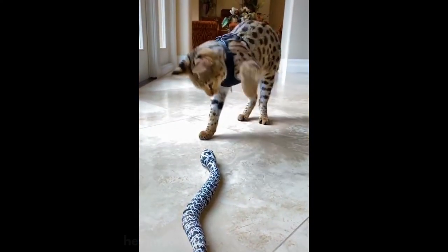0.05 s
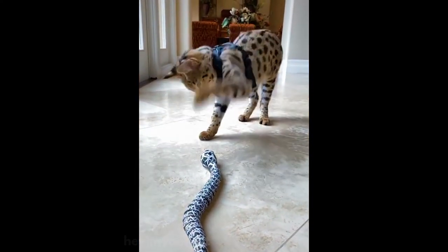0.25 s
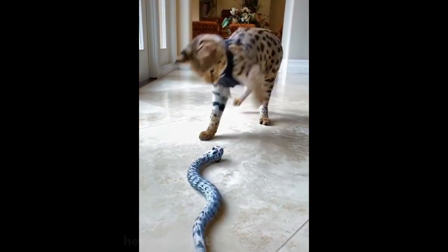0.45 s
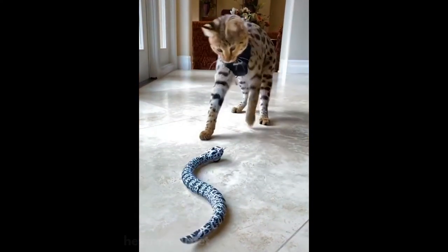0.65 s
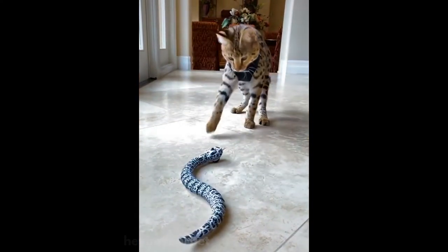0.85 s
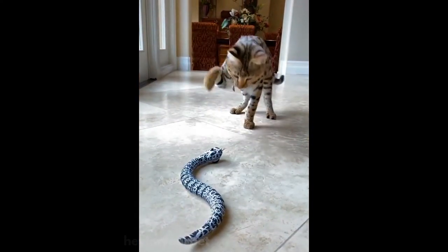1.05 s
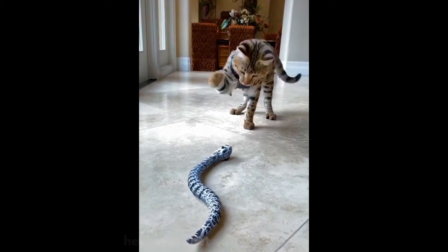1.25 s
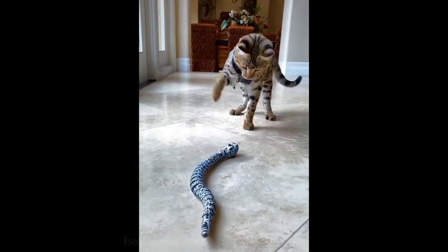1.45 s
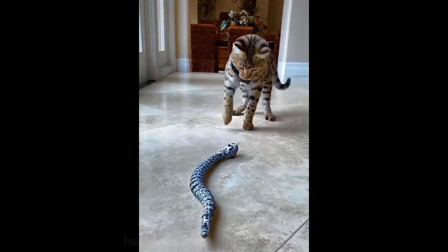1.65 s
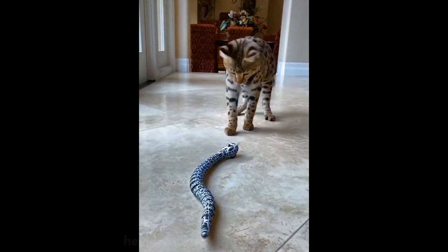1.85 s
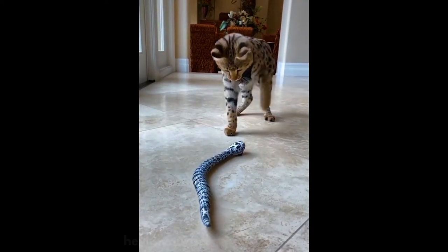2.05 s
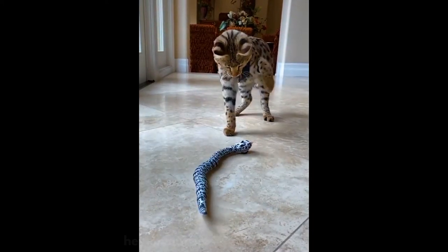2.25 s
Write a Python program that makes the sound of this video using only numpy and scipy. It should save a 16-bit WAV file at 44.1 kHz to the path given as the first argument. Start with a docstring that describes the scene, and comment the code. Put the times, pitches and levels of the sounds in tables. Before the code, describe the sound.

Toy snake of hard plastic segments: faint click, hollow paw knock, clattering skid and sharp slap, a pause, then a loud close click and clacking wriggle, repeated once more, with bright room echo over low rumble.

```python
"""A plastic toy snake skids, slaps and clacks on a stone floor after a cat swats it, then wriggles twice.
Its body is noise cut into dense ticks and single cracks, filtered to sound like plastic; its gears sizzle.
A button close to the microphone, first faint and then twice loud, is a set of dying tones with a scratchy edge.
The paw is a sinking thud and a hollow knock. A hard room rings after snake and button, over rumble and hum."""
import sys
import numpy as np
from scipy import signal
from scipy.fft import rfft, irfft
from scipy.io import wavfile

SR = 44100
rng = np.random.default_rng(int(sys.argv[2]) if len(sys.argv) > 2 else 0)


def put_to_file(sound):
    """Save the sound as 16-bit audio at rate SR, in the file named by the first command-line argument."""
    columns = np.atleast_2d(sound).T  # one column per channel
    safe = np.clip(columns, -1, 1)
    whole_steps = np.round(safe * 32767)
    wavfile.write(sys.argv[1], SR, whole_steps.astype(np.int16))


N = 99225  # length of the scene in samples
SHORT = np.arange(SR // 8) / SR  # time axis of one contact (s)


def amp(db):
    """Turn decibels into a gain."""
    return 10 ** (np.asarray(db) / 20)


def unit(x):
    """Scale to an rms (average strength) of 1."""
    return x / np.sqrt(np.mean(x ** 2) + 1e-20)


def along(points, hz):
    """Read a curve of (Hz, value) points at any frequency, on a log axis."""
    point_hz, values = np.transpose(points)
    return np.interp(np.log(hz + 1), np.log(point_hz + 1), values)


def fade(t, t60):
    """Silence before t = 0, then a steady dying away by 60 dB in t60 seconds."""
    return (t >= 0) * np.exp(-np.log(1000) * np.abs(t) / t60)


def coloured(x, points):
    """Filter to a (Hz, dB) curve, using only past sound and keeping the power of white noise."""
    size = 4096
    gain = unit(amp(along(points, np.fft.rfftfreq(size, 1 / SR))))
    # folding the cepstrum (spectrum of the log gain) makes the filter respond as early as it can
    cepstrum = irfft(np.log(gain), size)
    cepstrum[1:size // 2] *= 2
    cepstrum[size // 2 + 1:] = 0
    response = irfft(np.exp(rfft(cepstrum)), size)
    return signal.oaconvolve(x, response)[:N]


def placed(sounds):
    """Add up (start in seconds, short sound) pairs on the time line."""
    out = np.zeros(N + SR)
    for s, sound in sounds:
        out[round(s * SR):][:len(sound)] += sound
    return out[:N]


def ring(modes, rise):
    """After one blow a body sounds several dying tones, each level varied a little at random."""
    tones = 0
    for hz, db, t60 in modes:
        level = amp(db + rng.normal())
        tones = tones + level * np.sin(2 * np.pi * hz * SHORT) * fade(SHORT, t60)
    return (1 - np.exp(-SHORT / rise)) * tones


def cracks(rows, t60):
    """Each (start, dB) hit is a burst of random plus and minus signs under a smooth decay."""
    decay = fade(SHORT, t60) * (1 - np.exp(-SHORT / 0.00014))  # attack in s
    power = placed((s, (amp(db) * decay) ** 2) for s, db in rows)
    return np.sign(rng.standard_normal(N)) * np.sqrt(power)


def ticks(rate, spread_db, t60):
    """Many tiny hits at random moments, rate per second, shape noise into a stream of rms 1."""
    strength = amp(spread_db * np.clip(rng.standard_normal(N), -2, 2))
    hits = (rng.random(N) < rate / SR) * strength
    power = signal.oaconvolve(hits ** 2, fade(SHORT, t60) ** 2)[:N]
    return unit(np.sqrt(np.abs(power)) * rng.standard_normal(N))


def movement(rows, rise, fall_db_per_s):
    """Loudness of movements that swell for up to rise seconds and run out after their length."""
    t = np.arange(SR * 3 // 4) / SR
    start_db = 20.5 * np.clip(1 - t / rise, 0, 1) ** 2  # starts 20.5 dB down
    powers = []
    for s, length, db in rows:
        fall_db = fall_db_per_s * np.maximum(t - length, 0)
        powers.append((s, amp(db - start_db - fall_db) ** 2))
    return np.sqrt(placed(powers))


def room_tone():
    """Filtered noise makes a low rumble with faint hiss; a steady sine makes a faint hum."""
    # Colour of the background noise. Each row: frequency in Hz, relative level in dB per Hz.
    floor_colour = [(15, -43), (25, -6.5), (77, -2), (123, -8.5), (257, -15.5), (300, -14), (770, -24),
                    (833, -23), (1030, -22), (1330, -26.5), (1780, -25), (2030, -27), (2190, -26),
                    (7910, -37.5), (13000, -42)]
    floor_db, hum_hz, hum_db = -58, 248.7, -67.5
    highpass = signal.butter(4, 36, "high", fs=SR, output="sos")  # cutoff in Hz
    noise = signal.sosfilt(highpass, coloured(rng.standard_normal(N), floor_colour))
    hum = np.sin(2 * np.pi * hum_hz * np.arange(N) / SR)
    return amp(floor_db) * unit(noise) + amp(hum_db) * hum


def button():
    """Each press snaps and rings one note with a scratchy edge; low knocks dull the first and mark returns."""
    # Button going down. Each row: start in seconds, snap level in dB, ringing note level in dB.
    presses = [(0.1055, -27, -46), (0.9155, -4.5, -15), (1.6267, -6.5, -14.5)]
    # Tones of the snap. Each row: frequency in Hz, relative level in dB, time to fall 60 dB in seconds.
    snap = [(760, -23, 0.024), (890, -17, .012), (1620, -11.5, 0.0054), (1895, -13, 0.01),
            (3400, -20, .008), (5830, -13.5, 0.017), (6320, 5.5, 0.0033), (6870, -11, 0.009),
            (8660, -11.5, .007), (9170, -13, .007), (12300, -14.5, 0.004)]
    # Low knock of the button: under the faint first press, then at each return.
    # Each row: start in seconds, level in dB.
    knocks = [(0.1064, -41), (1.0826, -26.5), (1.9664, -25)]
    # Tones of the low knock. Each row: frequency in Hz, relative level in dB, 60 dB fall in seconds.
    knock_tones = [(480, -26.5, .018), (709, 4.5, 0.023), (964, -4, 0.024), (1410, -8.5, 0.036),
                   (1840, 7.5, .016), (1990, 3, 0.029)]
    # Scratchy edge of each press. Each row: start in seconds, level in dB.
    grit = [(0.1057, -36), (0.9152, -29.5), (1.6263, -31.5)]
    # Colour of that edge. Each row: frequency in Hz, relative level in dB per Hz.
    grit_colour = [(200, -23), (900, 4.5), (1300, -3.5), (2200, 2), (3000, 4.5), (4500, 2), (7000, 0),
                   (10000, -10.5), (13000, -22.5)]
    note_hz, note_t60_s, note_rise_s = 4434, 0.018, 0.00023

    snaps = []
    for s, db, note_db in presses:
        snap_sound = amp(db) * ring(snap, rise=0.00043)
        note = amp(note_db) * ring([(note_hz, 0, note_t60_s)], note_rise_s)
        snaps.append((s, snap_sound + note))
    low_knocks = [(s, amp(db) * ring(knock_tones, rise=0.0007)) for s, db in knocks]
    scratch = coloured(cracks(grit, t60=0.027), grit_colour)
    clicks = placed(snaps) + placed(low_knocks) + scratch
    # the small housing gives little below 362 Hz
    highpass = signal.butter(2, 362, "high", fs=SR, output="sos")
    return signal.sosfilt(highpass, clicks)


def room(x):
    """A hard room's tail: noise that dies away after a short delay, the treble first."""
    # How long the room rings. Each row: frequency in Hz, time to fall 60 dB in seconds.
    room_t60 = [(300, 0.69), (2500, 0.63), (5500, 0.61), (9000, 0.38), (13000, 0.23)]
    delay_s = 0.012
    hz, t, bands = signal.stft(rng.standard_normal(SR), SR, nperseg=256)
    dying_bands = bands * fade(t, along(room_t60, hz)[:, None])
    tail = signal.istft(dying_bands, SR, nperseg=256)[1]
    tail = np.pad(tail / np.linalg.norm(tail), (int(delay_s * SR), 0))
    return signal.fftconvolve(x, tail)[:N]


def room_echo(driven, struck, clicks):
    """Echo of the snake and, more weakly, of the button, with the room's own colour."""
    # Colour of the button's echo. Each row: frequency in Hz, relative level in dB.
    button_echo = [(300, -5), (800, -3), (2000, -2.5), (3500, 1.5), (4300, -3), (4700, 0.5), (5500, -12),
                   (7000, -8.5), (9000, -4), (13000, -4)]
    # Colour of the whole echo. Each row: frequency in Hz, relative level in dB.
    room_colour = [(300, 1.5), (1200, 3), (2500, -1.5), (3300, 2), (3900, -6.5), (5200, 2.5), (6600, 2),
                   (9000, 0), (12500, 2)]
    driven_db, struck_db, button_db = -8.5, -8, -23.5
    into_room = amp(driven_db) * driven + amp(button_db) * coloured(clicks, button_echo)
    echo = room(into_room) + room(amp(struck_db) * struck)
    return coloured(echo, room_colour)


def paw():
    """The paw knocks on the hollow head, which rings, and adds a soft thud whose pitch sinks."""
    # Tones of the hollow head. Each row: frequency in Hz, relative level in dB, 60 dB fall in seconds.
    head = [(620, -19.5, 0.027), (1030, -18, 0.051), (1590, -4, 0.029), (1930, -0.5, 0.023),
            (2350, -2, 0.042)]
    head_s, head_db = 0.2098, -18.5
    thud_s, thud_db, thud_t60_s = 0.214, -36.5, 0.14
    start_hz, end_hz, sag_s = 230, 75, 0.0086  # sag_s: how quickly the pitch sinks

    hz = end_hz + (start_hz - end_hz) * np.exp(-SHORT / sag_s)
    tone = np.sin(2 * np.pi * np.cumsum(hz) / SR)
    thud = amp(thud_db) * tone * fade(SHORT, thud_t60_s) * (1 - np.exp(-SHORT / 0.0024))
    knock = amp(head_db) * ring(head, rise=0.0014)
    return placed([(thud_s, thud), (head_s, knock)])


def swat():
    """The snake skids, shoved or coasting, in a dense clatter of ticks and slaps the floor in cracks."""
    # Sliding along the floor. Each row: start in seconds, length in seconds, level in dB.
    skids = [(0.2105, 0.012, -27), (0.2155, 0.0054, -20), (0.258, 0.045, -24.5), (0.31, 0.061, -28.5),
             (1.985, 0.048, -40), (2.07, 0.017, -42.5)]
    # Colour of the sliding. Each row: frequency in Hz, relative level in dB per Hz.
    sliding = [(200, -25), (700, -24), (1300, -21), (1700, -13), (2100, -5.5), (2600, 3.5), (3300, -4.5),
               (4300, 1), (5300, -8), (7000, -8.5), (9300, -9.5), (10500, -20), (13000, -22.5)]
    # The body slapping the floor. Each row: start in seconds, level in dB.
    slaps = [(0.3368, -10), (0.3395, -17.5), (0.3430, -20), (0.4448, -30)]
    # Colour of the slaps. Each row: frequency in Hz, relative level in dB per Hz.
    slapping = [(300, -33), (1100, -14.5), (1900, -12), (2550, 0), (3100, -6.5), (3700, 1), (4500, -2),
                (5700, 0), (7000, -4), (9800, -3), (10800, -15.5), (13000, -13)]
    loudness = movement(skids, rise=0.0013, fall_db_per_s=613)
    skid = loudness * ticks(rate=2000, spread_db=2, t60=0.027)
    return coloured(skid, sliding) + coloured(cracks(slaps, t60=0.038), slapping)


def wriggle():
    """Gears sizzle and segments tick against each other, with clacks as joints hit their stops."""
    # The snake driven by its motor. Each row: start in seconds, length in seconds, level in dB.
    wriggles = [(0.945, 0.18, -28), (1.13, 0.095, -31.5), (1.718, 0.25, -33.5)]
    # Colour of the rattling segments. Each row: frequency in Hz, relative level in dB per Hz.
    joints = [(300, -28.5), (1200, -28.5), (1600, -15), (2000, -3), (2450, 3), (3000, -7), (3500, -1.5),
              (3950, 8.5), (4250, 1), (4650, 5.5), (5700, -7), (7700, -5.5), (8700, 0.5), (9500, -5.5),
              (10500, -13), (13000, -28)]
    # The motor's gears running. Each row: start in seconds, length in seconds, level in dB.
    gear_runs = [(0.947, 0.15, -45), (1.06, 0.13, -37.5), (1.715, 0.25, -40.5)]
    # Colour of the gears. Each row: frequency in Hz, relative level in dB per Hz.
    gearing = [(1500, -29), (3400, -7), (3980, -6), (4300, -16), (4700, -24), (5500, -14), (7700, -11.5),
               (8700, 3.5), (9500, 1), (10500, -9.5), (12500, -15.5)]
    # A joint hitting its stop. Each row: start in seconds, level in dB.
    clacks = [(0.9503, -27.5), (0.9645, -51), (0.9975, -36), (1.005, -32), (1.0123, -16.5), (1.0195, -19),
              (1.0258, -35), (1.0338, -42), (1.056, -23.5), (1.0636, -19), (1.0923, -19), (1.1036, -30),
              (1.1228, -31), (1.1435, -26.5), (1.1564, -19.5), (1.1685, -15), (1.1774, -24), (1.2058, -27),
              (1.2128, -19.5), (1.2209, -20.5), (1.7275, -31.5), (1.7839, -20.5), (1.7882, -28),
              (1.8174, -27.5), (1.8312, -20), (1.8333, -19), (1.8629, -25), (1.9044, -29), (1.9175, -18.5),
              (1.9387, -22), (1.9448, -21), (1.9503, -26.5), (1.9581, -16.5), (1.9649, -19.5),
              (1.977, -21.5), (2.079, -53)]
    # Colour of the clacks. Each row: frequency in Hz, relative level in dB per Hz.
    clacking = [(300, -27), (1200, -24), (1600, -16), (2000, -1), (2450, 2.5), (3000, -3), (3500, 2),
                (3950, 3.5), (4300, -1), (4800, 3), (5700, -4.5), (7700, -4), (8700, 4), (9500, -4.5),
                (10500, -11), (13000, -22)]

    rattle_loudness = movement(wriggles, rise=0.13, fall_db_per_s=246)
    rattle = rattle_loudness * ticks(rate=1500, spread_db=3.5, t60=0.0079)
    gear_loudness = movement(gear_runs, rise=0.043, fall_db_per_s=262)
    gears = gear_loudness * ticks(rate=4900, spread_db=1.5, t60=0.0079)
    stops = coloured(cracks(clacks, t60=0.016), clacking)
    return coloured(rattle, joints) + coloured(gears, gearing) + stops


def settling():
    """The resting snake creaks faintly: quiet cracks with a bright colour."""
    # The creaks. Each row: start in seconds, level in dB.
    creaks = [(1.474, -52), (1.479, -82)]
    # Colour of the creaks. Each row: frequency in Hz, relative level in dB per Hz.
    creak_colour = [(1000, -30), (5000, -15.5), (8000, 3), (10000, -6), (13000, -12)]
    return coloured(cracks(creaks, t60=0.023), creak_colour)


def scene():
    """The snake is out in the room, the button close and nearly without echo, the paw without any."""
    driven = wriggle() + settling()
    struck = swat()
    clicks = button()
    echo = room_echo(driven, struck, clicks)
    return (driven + struck + clicks + paw() + echo + room_tone())[None]


def record(dry):
    """A steep low-pass filter removes nearly everything above 13000 Hz."""
    lowpass = signal.ellip(10, 0.1, 80, 13000, fs=SR, output="sos")
    return signal.sosfilt(lowpass, dry)


dry = scene()
out = record(dry)
put_to_file(out)
```